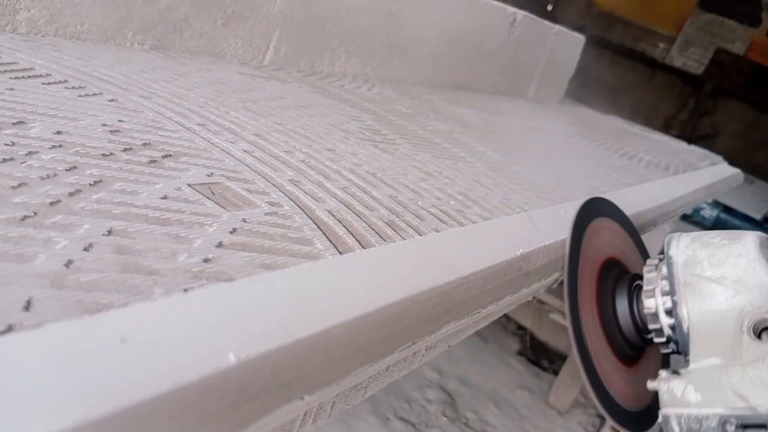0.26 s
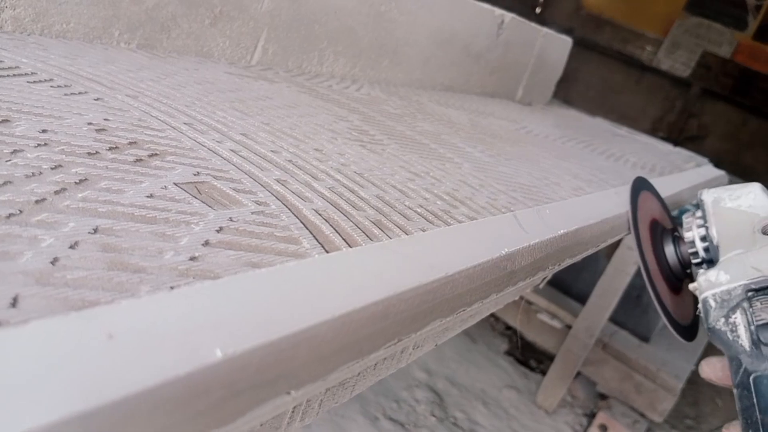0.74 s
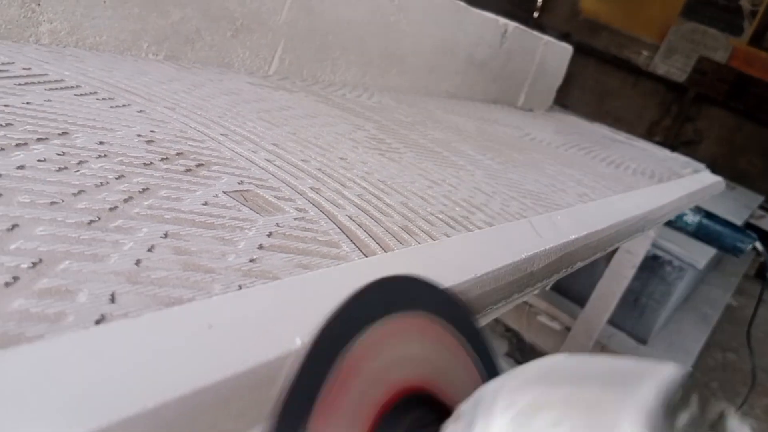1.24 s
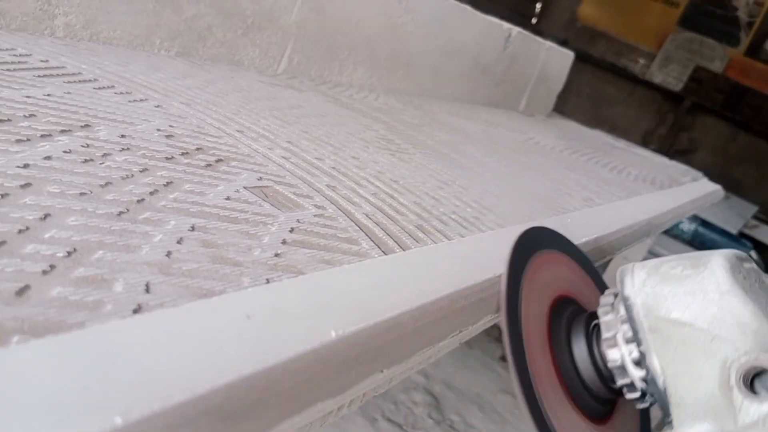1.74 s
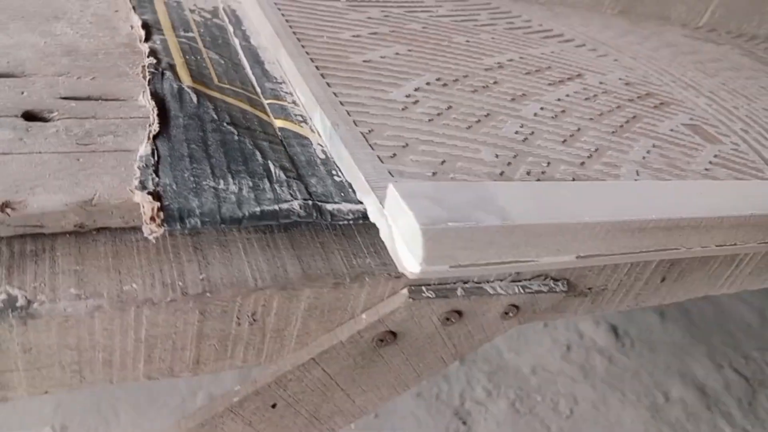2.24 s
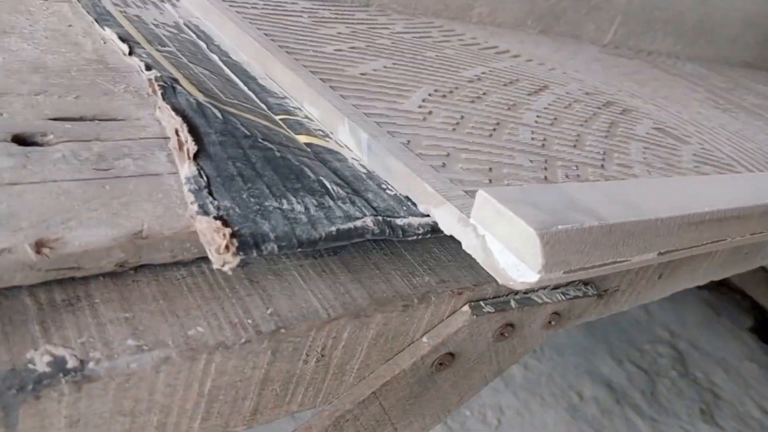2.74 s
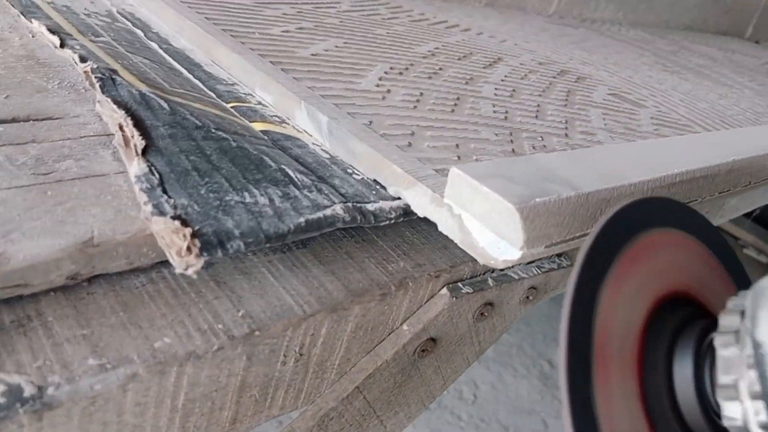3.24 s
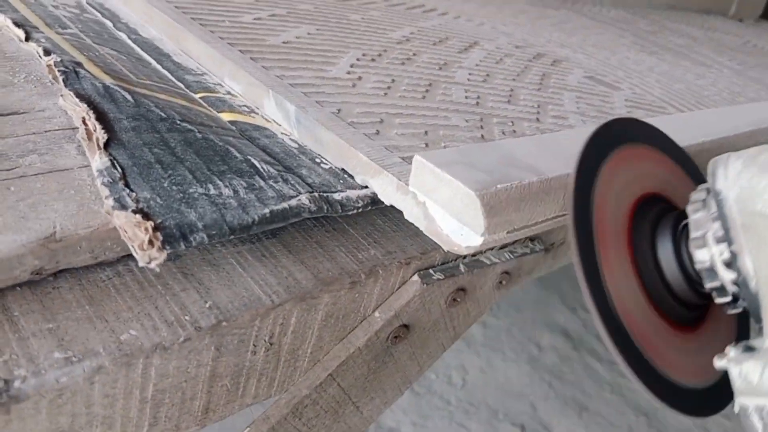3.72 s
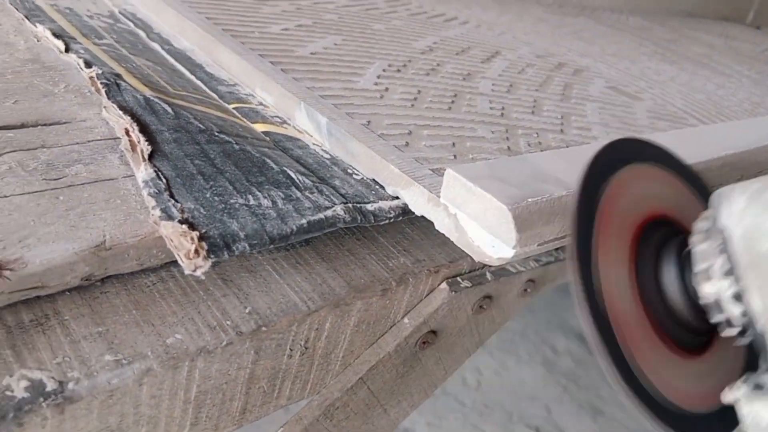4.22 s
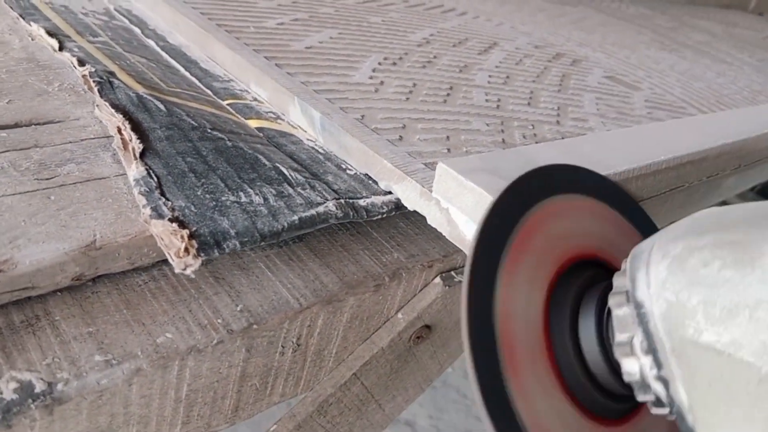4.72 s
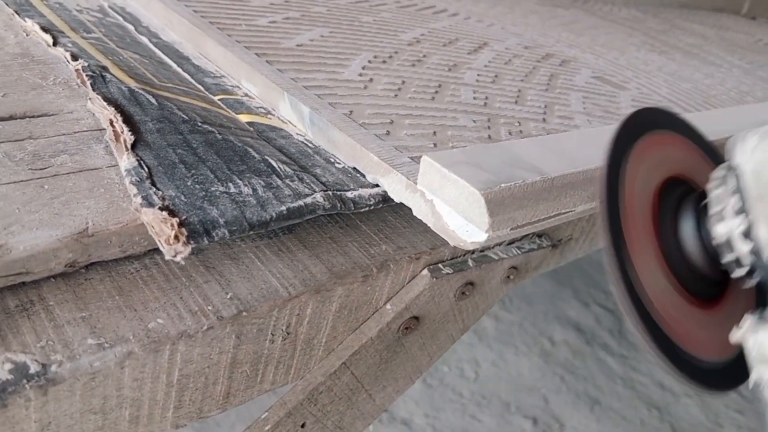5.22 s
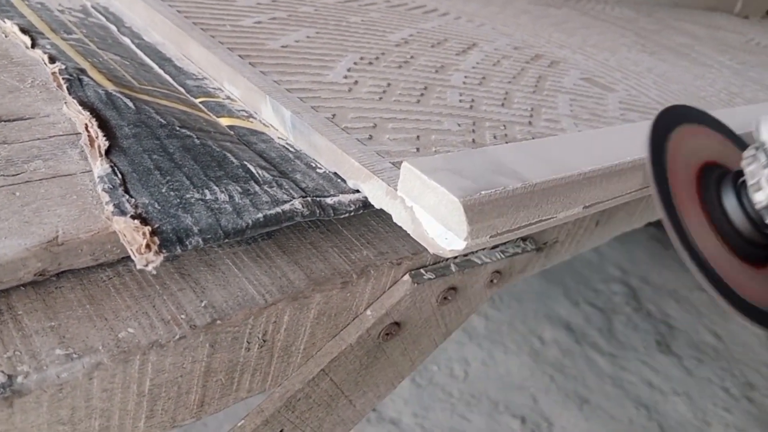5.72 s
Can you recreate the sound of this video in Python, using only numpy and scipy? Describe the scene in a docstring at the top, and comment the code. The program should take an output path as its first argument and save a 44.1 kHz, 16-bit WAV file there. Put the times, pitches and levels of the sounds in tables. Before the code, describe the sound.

Close, dry sound of a power grinder on stone. A harsh, loud stretch of gear whine, squeals, fan rush and dusty rasp wavers in pitch, with exhaust air thumping the microphone. It ends abruptly with a thump; then the tool runs faster and far softer, smooth and airy at first, then whining with repeated gritty touches, slowly dropping in pitch and fading slightly towards the end.

```python
"""Angle grinder on a stone tile

An angle grinder with an abrasive disc smooths the edge of a stone tile: first pressed hard, then lighter.
The disc scrapes the same slowly changing rough pattern every turn, which makes a dense comb of tones.
Sine tones give the whine of gears and motor and short squeals; shaped noise gives fan rush and dust hiss.
The speed sags under load, and exhaust air buffets the microphone with rumble, eddies and pops.
A thump, made as a pulse like the pops, is heard where the hard stretch ends.
"""
import sys
import numpy as np
from scipy import signal
from scipy.fft import rfft, irfft
from scipy.io import wavfile
from scipy.ndimage import uniform_filter1d, map_coordinates

SR = 44100
rng = np.random.default_rng(int(sys.argv[2]) if len(sys.argv) > 2 else 0)


def wav_record(signal):
    """Record a signal, one row per channel, as 16-bit PCM in the file named by sys.argv[1]."""
    frames = np.transpose(np.atleast_2d(signal))
    bounded = np.clip(frames, -1, 1)
    # unit amplitude maps onto the largest positive 16-bit level
    quanta = np.round(bounded * 32767).astype(np.int16)
    wavfile.write(sys.argv[1], SR, quanta)


N = 262836  # length [samples]
HOP = 256  # spacing of the slow control frames [samples]
TIME = np.arange(N) / SR  # [s]
FRAME_TIME = np.arange(N // HOP + 5) * HOP / SR  # [s]
HARD_END, LIGHT_START = 2.133, 2.138  # the two stretches, with a tiny gap between [s]
GEAR_RATIO = 32 / 9  # motor turns per disc turn
TOP_HZ = 15650  # upper limit of the sound [Hz]

# All table levels are starting points; later trims and wavering move them.
# speed of the disc, sagging under load: (time [s], speed [turns/s])
HARD_SPEED_CURVE = [(0, 132.4), (.08, 131.2), (.2, 127.5), (.4, 123), (.62, 122.4), (.85, 127.5),
                    (1.1, 130.1), (1.48, 134.3), (1.7, 130.7), (2.12, 123.4)]
LIGHT_SPEED_CURVE = [(2.14, 151.8), (2.5, 152.7), (3.48, 153.1), (4.0, 147.8), (4.12, 148), (4.3, 144.4),
                     (4.5, 142.9), (4.72, 144.5), (5.05, 141.1), (5.3, 141.4), (5.48, 142.9), (5.8, 137.4),
                     (5.96, 137)]
# levels as the tool is moved and turned: (time [s], fan rush [dB], gear whine [dB])
HARD_LEVEL_CURVE = [(0, 1, 3), (.48, -2, 0.5), (.72, -1, -6.5), (1.03, -1, -2), (1.25, -0.5, -0.5),
                    (1.45, 1.2, 2), (1.8, -2.5, 0), (2.13, -4, 0.5)]
LIGHT_LEVEL_CURVE = [(2.14, 1.1, -26), (3.35, 3.5, -22), (3.78, 1.5, 2.5), (4.14, 3.5, 5.5),
                     (4.34, -5.5, 0), (4.72, -3, 2), (5.08, -5, -2), (5.4, -1.5, 0), (5.7, -5, 0),
                     (5.82, -11.5, -8), (5.96, -9.5, -9)]
# the disc bites into the edge: (centre [s], length [s], rasp [dB], dust hiss [dB])
DISC_BITES = [(0.098, 0.32, 2, -16), (0.565, 0.3, 0, -7), (0.865, 0.11, 3, 3), (1.067, 0.19, 6, -4),
              (1.847, 0.27, 4.5, -9), (2.08, 0.1, -1.5, -11), (3.625, 0.13, -6, 0.5), (3.805, 0.23, 5, -3),
              (4.26, .17, 5, 4), (4.5, .1, 1, -12), (4.954, .17, 5, -1), (5.183, 0.085, 5.5, -3),
              (5.648, 0.17, 6.5, -4), (5.89, .13, -5.5, -19)]
# between bites: (pressed hard [dB], pressed lightly [dB])
REST_RASP_DB = (-12, -4)
REST_DUST_DB = (-3.3, -0.6)
DUST_PER_RUSH = 0.56  # dB of dust hiss for each dB of fan rush
# gusts of exhaust air on the microphone: (centre [s], length [s], level [dB])
AIR_GUSTS = [(1.082, 0.12, -23.5), (1.095, 0.048, -15.5), (1.808, 0.055, -25), (1.945, 0.12, -31.5),
             (2.564, 0.036, -40), (4.305, 0.071, -31), (4.998, 0.14, -44), (5.187, 0.043, -33.5),
             (5.684, 0.08, -27.5), (5.775, 0.081, -27)]
# strongest pops and thumps: (start [s], level [dB], time scale of the pulse [ms])
# the one at 2.132 s is a thump where the hard stretch ends
POPS_AND_THUMPS = [(1.047, 3.5, 0.27), (1.067, -14, .3), (1.082, 9, 0.24), (1.096, 4, 0.97),
                   (1.785, 0.5, 1), (2.132, -0.5, 0.22), (4.274, -12, 1), (5.195, -12, 0.85),
                   (5.66, -8, 0.82)]
# the steady draught between gusts: (pressed hard [dB], pressed lightly [dB])
DRAUGHT_DB = (-38, -54.5)
# rush of fan and dust: (frequency [Hz], pressed hard [dB per Hz], pressed lightly [dB per Hz])
AIR_SPECTRUM = [(30, -100, -105), (128, -71.5, -104), (326, -64, -72.5), (537, -65.5, -75),
                (840, -54.5, -63.5), (1480, -55.5, -65), (2480, -56, -65.5), (3050, -56, -69),
                (3630, -54.5, -67.5), (5800, -60, -72.5), (7730, -53, -67.5), (8960, -57.5, -70.5),
                (9160, -61.5, -76), (13800, -59.5, -79), (14100, -69, -89), (15200, -57, -87)]
# tones of disc and gears: (multiple of the turning rate [1], pressed hard [dB], pressed lightly [dB])
SHAFT_TONES = [(1, -41.5, -52.5), (4, -38.5, -56), (5, -48, -59), (10, -57, -44.5), (11, -35.5, -70),
               (13, -42, -46), (16, -32, -65), (17, -37.5, -61), (19, -37, -53), (22, -31, -67),
               (23, -39, -51), (24, -36, -64), (26, -25, -48), (28, -27.5, -49), (31, -37, -46),
               (32, -29, -50)]
# motor tones, first multiple upward: (pressed hard [dB], pressed lightly [dB])
MOTOR_TONES = [(-39.5, -50.5), (-38, -46), (-37.5, -61), (-34, -46), (-31.5, -46.5), (-38, -50), (-46, -55),
               (-35.5, -49)]
# the tool sings out on one tone: (centre [s], length [s], multiple of the turning rate [1], level [dB])
SQUEAL_TONES = [(0.104, 0.14, 27, -16), (.08, 0.26, 26, -17.5), (0.386, 0.17, 26, -20),
                (.53, 0.18, 28, -25.5), (0.66, 0.13, 29, -27.5), (1.15, 0.15, 64, -23.5),
                (1.344, 0.26, 52, -25), (1.607, 0.25, 26, -20), (1.543, 0.13, 27, -28),
                (1.82, 0.1, 32, -23), (1.9, 0.16, 57, -26), (3.333, 0.61, 3.556, -41.5),
                (3.51, 0.086, 14, -35), (3.77, 0.34, 51, -37), (4.052, 0.2, 10, -38),
                (4.736, .25, 26, -42.5), (5.048, 0.16, 13, -39.5), (5.268, 0.034, 25, -33.5),
                (5.416, 0.16, 10, -41.5), (5.485, 0.2, 7.111, -39.5)]
WOBBLE_TURNS = 0.0039  # in a squeal the disc runs ahead and falls back by this much every turn [turns]
# strength of each line of the scrape: (frequency [Hz], pressed hard [dB], pressed lightly [dB])
SCRAPE_SPECTRUM = [(300, -64, -98), (910, -35, -49.5), (1420, -52, -59), (2300, -33, -52),
                   (3060, -44, -58.5), (3690, -29, -48.5), (4310, -31.5, -45.5), (5840, -41.5, -54.5),
                   (7400, -32, -47), (8900, -38.5, -48.5), (9160, -38, -65), (9940, -34.5, -47.5),
                   (11950, -39.5, -64), (13500, -43, -60), (15200, -44, -56)]


def amp(db):
    """Turns decibels into gain."""
    return 10 ** (np.asarray(db) / 20)


def evened(x):
    """Scales a signal to an rms of 1."""
    return x / np.sqrt(np.mean(abs(x) ** 2) + 1e-20)


def read_spectrum(table, hz, column):
    """Reads one column of a spectrum, joining its points on a log-frequency axis."""
    table = np.transpose(table)
    return np.interp(np.log(hz + 1), np.log(table[0] + 1), table[column])


def controls(rows, t):
    """Reads every column of a curve table at the times t."""
    s, *columns = np.transpose(rows)
    return [np.interp(t, s, c) for c in columns]


def drift(hz, count=1):
    """Slow complex chance of rms 1, frames x count, changing about hz times a second."""
    chance = rng.standard_normal((len(FRAME_TIME), count, 2)) @ [1, 1j]
    rate = np.fft.fftfreq(len(FRAME_TIME), HOP / SR)[:, None]
    smoothed = np.fft.fft(chance, axis=0) / (1 + (rate / hz) ** 2)
    return evened(np.fft.ifft(smoothed, axis=0))


def waver(hz):
    """One slow random curve, with a value for every sample."""
    return np.interp(TIME, FRAME_TIME, evened(drift(hz)[:, 0].real))


def treble_share(hz, split_hz=5000):
    """Near 0 where the machine dominates, near 1 where the stone does."""
    return 1 / (1 + (split_hz / (hz + 1)) ** 8)


def band(x, hz, kind, order=2):
    """High-pass or low-pass filter."""
    return signal.sosfilt(signal.butter(order, hz, kind, fs=SR, output="sos"), x)


def hump(t, s, length, steep=2):
    """A bell around s whose power stays above half for the given length; steep squares its shoulders."""
    return 2 ** (-.5 * abs(2 * (t - s) / length) ** steep)


def line(turns, multiple, phases):
    """A sine of rms 1 locked to the shafts; the gearing allows only ninths of the turning rate."""
    ninths = round(multiple * 9)
    return np.sqrt(2) * np.sin(2 * np.pi * (ninths / 9 * turns + phases[ninths]))


def grinding(t):
    """Speed and the dB levels of fan rush, dust hiss, gear whine and rasp; bites add rasp and dust."""
    hard = t < HARD_END
    speed, = np.where(hard, controls(HARD_SPEED_CURVE, t), controls(LIGHT_SPEED_CURVE, t))
    rush_db, whine_db = np.where(hard, controls(HARD_LEVEL_CURVE, t), controls(LIGHT_LEVEL_CURVE, t))
    rasp = amp(np.where(hard, *REST_RASP_DB))
    dust = amp(np.where(hard, *REST_DUST_DB) + DUST_PER_RUSH * rush_db)
    for s, length, rasp_db, dust_db in DISC_BITES:
        bite = hump(t, s, length, steep=1.82)
        # hypot adds the powers
        rasp = np.hypot(rasp, amp(rasp_db) * bite)
        dust = np.hypot(dust, amp(dust_db) * bite)
    return speed, rush_db, 20 * np.log10(dust), whine_db, 20 * np.log10(rasp)


def pops_and_thumps():
    """Sudden pulses push on the microphone; the high-pass makes each one swing back."""
    pulses = np.zeros(N)
    for s, db, scale_ms in POPS_AND_THUMPS:
        age = np.arange(SR // 20) / SR / (scale_ms / 1000)  # counted in time scales
        pulse = amp(db) * age ** 0.91 * np.exp(0.66 * (1 - age))
        pulses[round(s * SR):][:len(age)] += pulse
    return amp(-3.5) * band(pulses, 127, "high")


def buffets(rumble_db=-4, eddies_db=-1, eddies_per_s=210, rumble_hz=200, eddy_hz=540, low_cut_hz=96,
            lumpy_db=3.0, flutter_db=2.5, draught_follow=0.46):
    """Exhaust air hits the microphone: low noise rumbles and random kicks make small eddies."""
    whine_db = grinding(TIME)[3]
    draught_db = np.where(TIME < HARD_END, *DRAUGHT_DB) + draught_follow * whine_db + lumpy_db * waver(11)
    gust_power = sum((amp(db) * hump(TIME, s, length)) ** 2 for s, length, db in AIR_GUSTS)
    level = np.sqrt(amp(draught_db) ** 2 + gust_power)
    level = level * evened(amp(flutter_db * waver(30)))
    rumble = band(rng.standard_normal(N), rumble_hz, "low")
    rumble = band(rumble, low_cut_hz, "high", order=3)
    kicks = rng.standard_normal(N) * (rng.random(N) < eddies_per_s / SR)
    eddies = band(kicks, eddy_hz, "low", order=1)
    eddies = band(eddies, 2800, "low", order=1)
    eddies = band(eddies, low_cut_hz, "high")
    return level * (amp(rumble_db) * evened(rumble) + amp(eddies_db) * evened(eddies))


def air(column, turns, patchy_db=1.45, flicker_db=1.55, throb=0.097):
    """Fan rush and stone dust hiss: noise in drifting patches, throbbing once a turn, more in a bite."""
    window = dict(nperseg=4 * HOP, noverlap=3 * HOP)
    hz = np.fft.rfftfreq(4 * HOP, 1 / SR)
    _, rush_db, dust_db, _, _ = grinding(FRAME_TIME[:, None])
    high = treble_share(hz)
    patches = evened(uniform_filter1d(drift(2.5, count=len(hz)).real, size=9, axis=1))
    level_db = read_spectrum(AIR_SPECTRUM, hz, column) + (1 - high) * rush_db + high * dust_db
    treble_flicker = high * evened(drift(25).real)
    level_db = level_db + patchy_db * patches + flicker_db * treble_flicker
    # white noise is cut into short frames, coloured and joined again
    noise = rng.standard_normal((len(FRAME_TIME) - 1) * HOP)
    frames = signal.stft(noise, **window)[2]
    rush = signal.istft(frames * amp(level_db.T), **window)[1][:N] * np.sqrt(SR / 2)
    bite = np.minimum(amp(grinding(TIME)[4]), 1)
    throbbing = 1 + throb * bite * np.cos(2 * np.pi * turns)
    return band(rush * throbbing, 77, "high")


def machine(column, turns, phases, gear_follow=0.94, motor_follow=0.47, waver_db=3.0):
    """Wavering tones of the disc shaft and of the faster motor behind the bevel gear."""
    _, rush_db, _, whine_db, _ = grinding(TIME)
    shaft = np.zeros(N)
    for row in SHAFT_TONES:
        shaft += amp(row[column] + waver_db * waver(7.4)) * line(turns, round(row[0]), phases)
    motor = np.zeros(N)
    for k, row in enumerate(MOTOR_TONES, start=1):
        level = amp(row[column - 1] + waver_db * waver(5.1))  # this table has no frequency column
        motor += level * line(turns, k * GEAR_RATIO, phases)
    return amp(gear_follow * whine_db - 3.5) * shaft + amp(motor_follow * rush_db - 2.5) * motor


def squeals(turns, phases, waver_db=2.0):
    """One tone swells for a moment; the disc's wobble spreads a high one into a cluster of close lines."""
    out = np.zeros(N)
    for s, length, multiple, db in SQUEAL_TONES:
        same_stretch = (TIME < HARD_END) == (s < HARD_END)
        near = (abs(TIME - s) < 2 * length) & same_stretch
        wobbly = turns[near] + WOBBLE_TURNS * np.sin(2 * np.pi * (turns[near] + rng.random()))
        level = amp(db + waver_db * waver(21)[near]) * hump(TIME[near], s, length, steep=3.5)
        out[near] += level * line(wobbly, multiple, phases + rng.random())
    return out


def scrape(column, turns, change_hz, lasting, uneven_db, count=128, size=2048):
    """Disc and gear teeth play one rough pattern per turn; it changes slowly as the contact shifts."""
    speed, _, _, whine_db, rasp_db = grinding(FRAME_TIME[:, None])
    hz = speed * np.arange(count)  # one line at each multiple of the turning rate
    high = treble_share(hz)
    kept = np.exp(2j * np.pi * rng.random(count))
    lasting = np.clip(lasting, 0, 1)  # share of the pattern's power that stays the same
    pattern = np.sqrt(lasting) * kept + np.sqrt(1 - lasting) * drift(change_hz, count=count)
    # neighbouring lines swell together as resonances of disc and tile come and go
    swell = evened(uniform_filter1d(drift(2.3, count=count).real, size=3, axis=1))
    pattern = evened(pattern * amp(uneven_db * swell))
    level_db = read_spectrum(SCRAPE_SPECTRUM, hz, column) + (1 - high) * whine_db + high * rasp_db
    pattern = pattern * amp(level_db) * (hz > 0)
    # each frame holds the wave of one turn; the disc's angle picks the point to play
    one_turn = irfft(pattern, size, axis=1) * size / np.sqrt(2)
    return map_coordinates(one_turn, [TIME * SR / HOP, turns % 1 * size], order=1, mode="grid-wrap")


def scene():
    """Plays both stretches, one after the other, with a tiny gap between them, alike in two channels."""
    first = TIME < HARD_END
    speed = grinding(TIME)[0]
    turns = np.cumsum(speed * (1 + 0.001015 * waver(20.7))) / SR  # turns so far, slightly unsteady
    phases = rng.random(size=1000)
    hard = air(column=1, turns=turns) + machine(column=1, turns=turns, phases=phases)
    hard = hard + amp(-1.5) * scrape(1, turns, change_hz=5.6, lasting=0.2, uneven_db=2.5)
    light = air(column=2, turns=turns) + machine(column=2, turns=turns, phases=phases)
    light = light + amp(-0.4) * scrape(2, turns, change_hz=8.6, lasting=0.051, uneven_db=2.0)
    sound = np.where(first, hard, light) + squeals(turns, phases) + buffets() + pops_and_thumps()
    audible = uniform_filter1d(1. * (first | (TIME > LIGHT_START)), size=80)  # soft edges at the gap
    return np.tile(sound * audible, (2, 1))


def record(dry, notch_hz=4850, notch_width_hz=1100, notch_db=-27):
    """A microphone whose port nearly cancels one frequency, clips loud peaks and drops the top treble."""
    off = (np.fft.rfftfreq(N, 1 / SR) - notch_hz) / notch_width_hz  # distance from the notch
    coloured = irfft(rfft(dry) * (amp(notch_db) + 1j * off) / (1 + 1j * off), N)
    low_pass = signal.firwin(511, TOP_HZ, window=("kaiser", 9), fs=SR)
    return signal.oaconvolve(np.clip(coloured, -1, 1), low_pass[None], "same")


dry = scene()
out = record(dry)
wav_record(out)
```